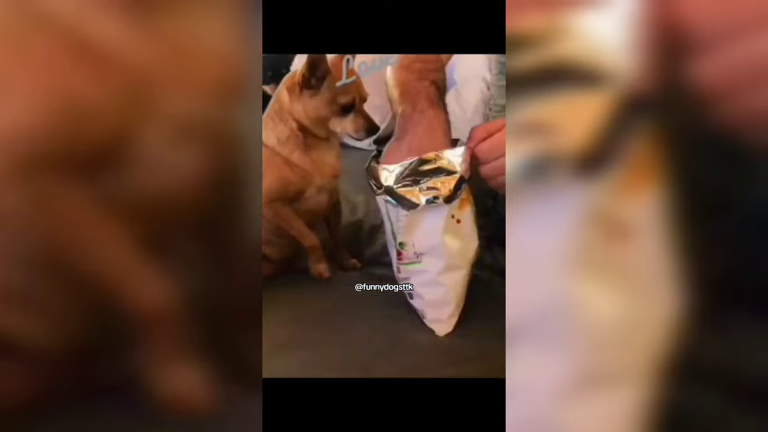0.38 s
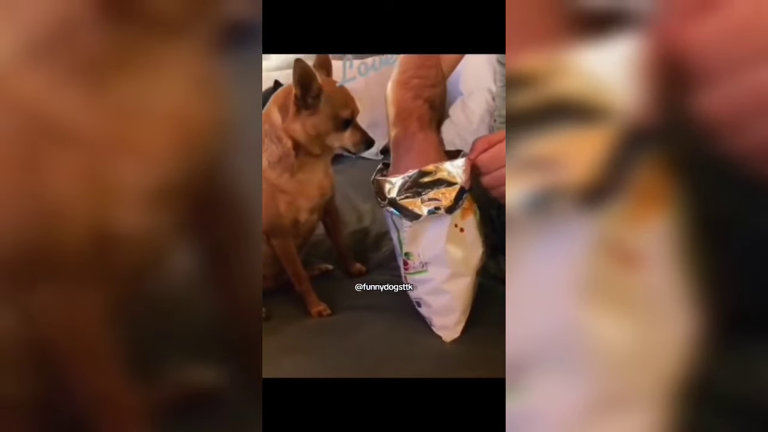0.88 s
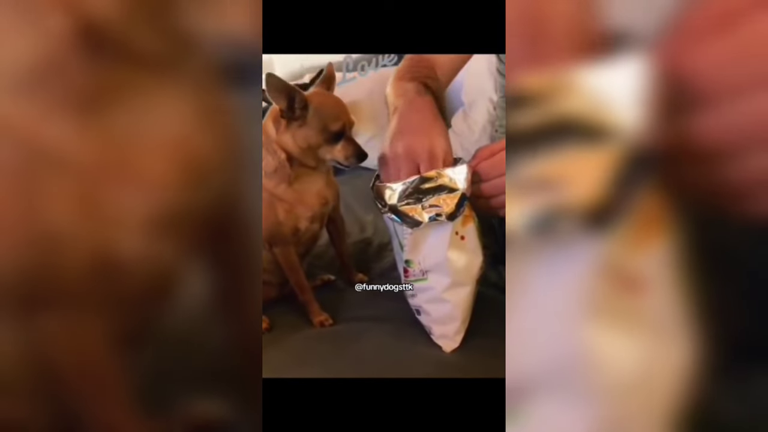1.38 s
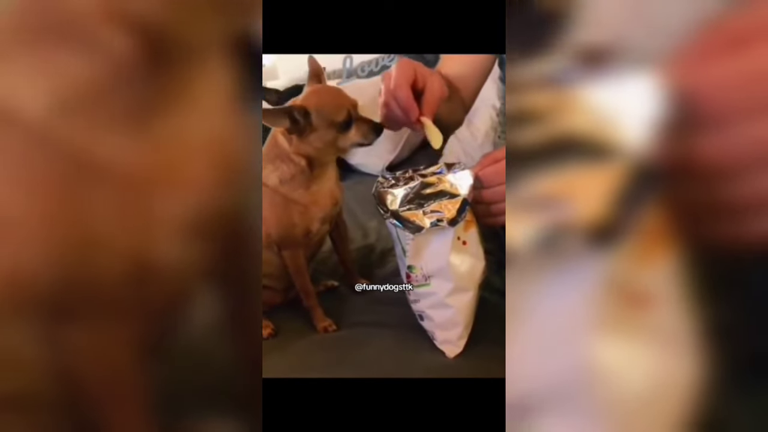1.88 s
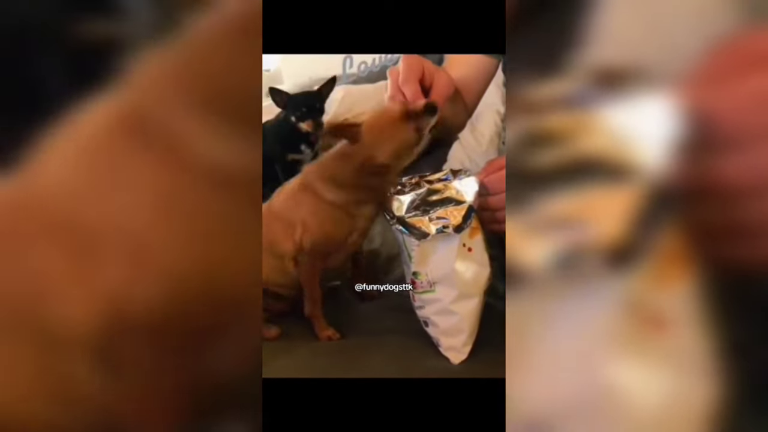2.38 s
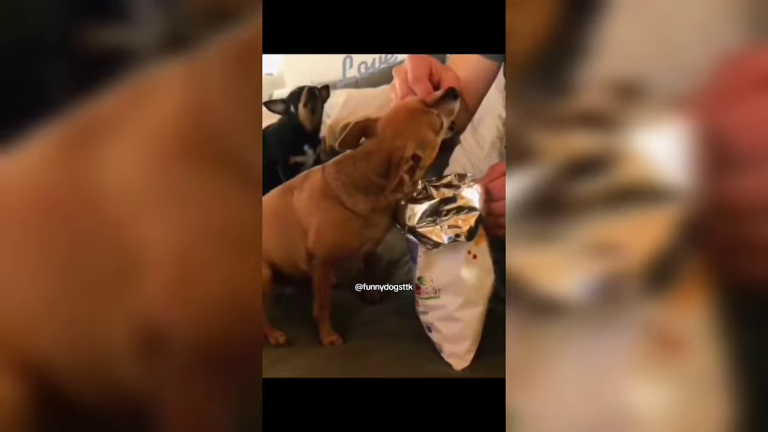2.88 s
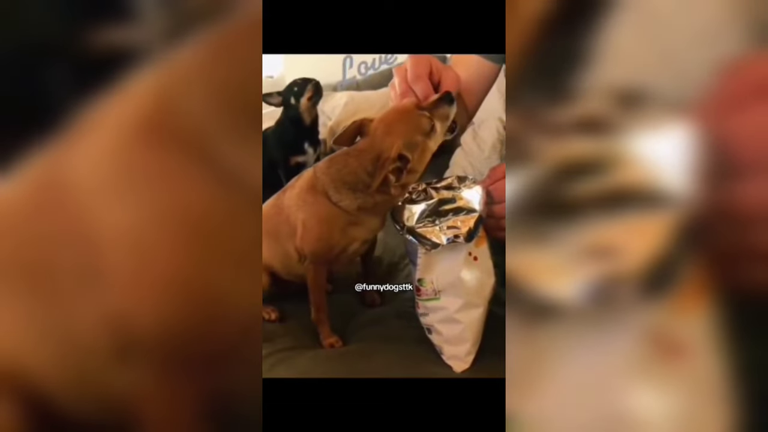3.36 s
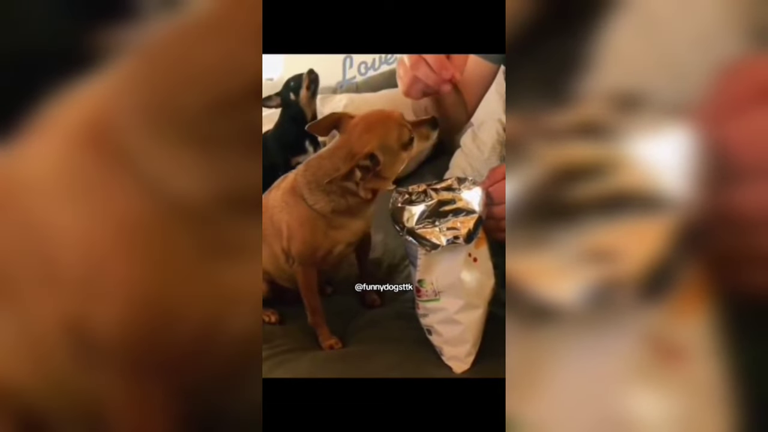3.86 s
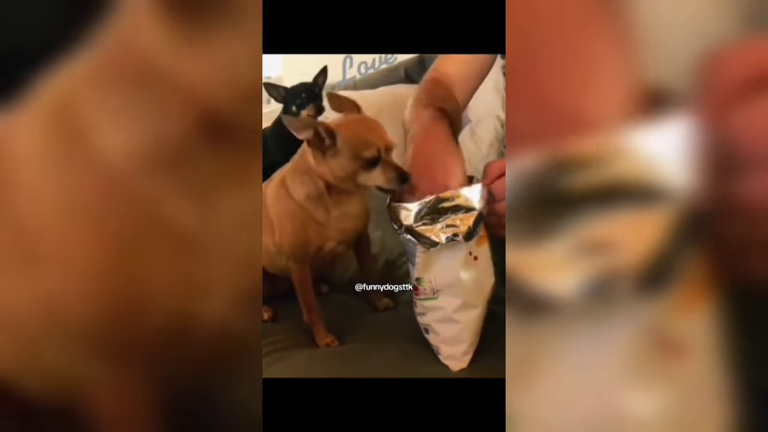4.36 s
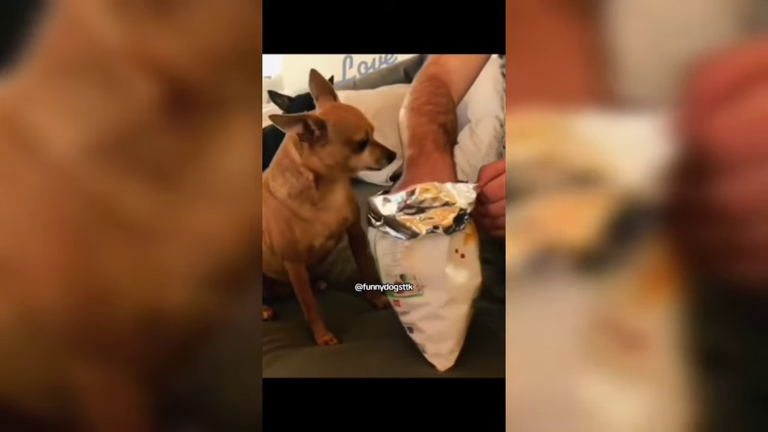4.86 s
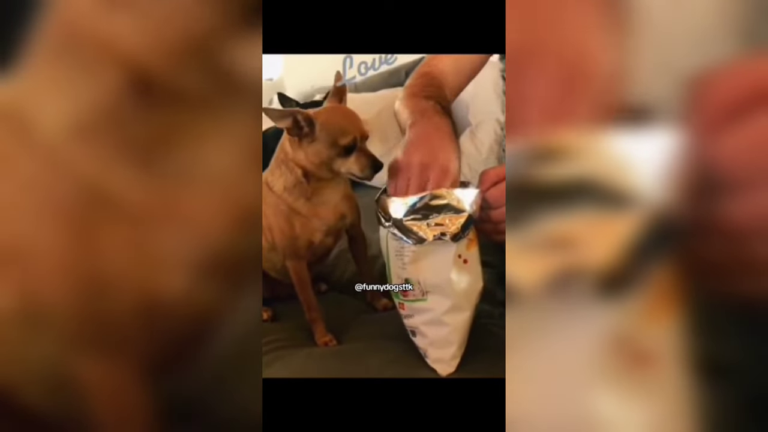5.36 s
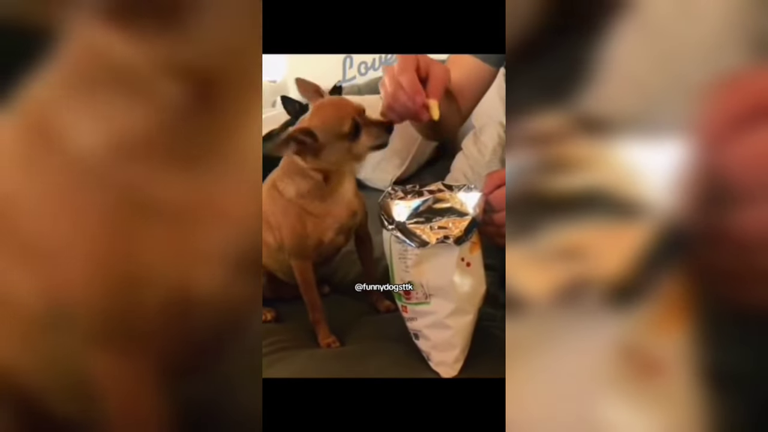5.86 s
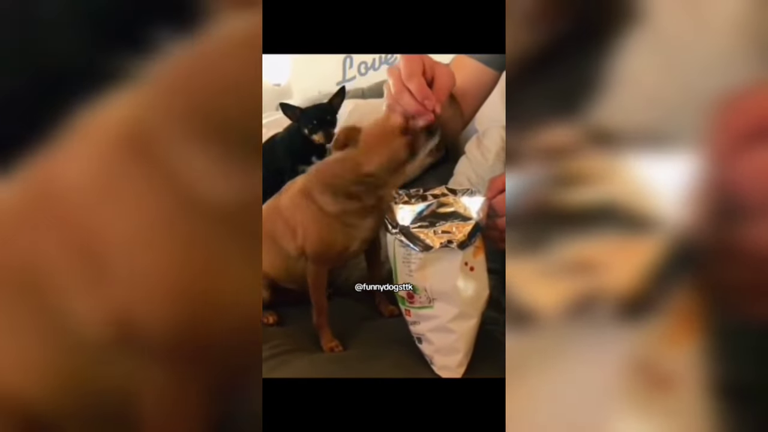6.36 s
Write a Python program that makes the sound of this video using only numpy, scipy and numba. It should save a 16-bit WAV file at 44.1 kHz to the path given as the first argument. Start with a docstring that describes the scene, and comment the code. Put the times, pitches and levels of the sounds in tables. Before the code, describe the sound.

After a scrap of room noise, a knock and brief silence, a foil snack bag crackles under a rummaging hand while a small dog barks and growls.

```python
"""First comes a scrap of steady noise from a hard-floored room; it ends in a knock and a short silence.
Then a hand rummages in a foil snack bag on a sofa: small clicks make the rustle, bursts of noise the snaps.
Soft thuds, low tones under dull noise, land on the cushions from time to time.
A small dog barks (rough pulses through a moving mouth), growls (throbbing noise), and later barks again."""
import sys
import numpy as np
from scipy import signal
from scipy.fft import rfft, irfft, next_fast_len
from scipy.io import wavfile
from scipy.ndimage import uniform_filter1d, minimum_filter1d
from numba import njit

SR = 44100
rng = np.random.default_rng(int(sys.argv[2]) if len(sys.argv) > 2 else 0)


def generate_wav(signal):
    """Clip the signal to [-1, 1] and save it as 16-bit WAV at the path in sys.argv[1]."""
    frames = np.transpose(np.atleast_2d(signal))
    scaled = np.clip(frames, -1, 1) * 32767
    pcm = np.round(scaled).astype(np.int16)
    wavfile.write(sys.argv[1], SR, pcm)


def nominal_scale(level):
    """Amplitude ratio for a level in decibels (scalar or array-like)."""
    x = np.asarray(level, float) / 20
    return 10 ** x


N = 286209
TIME = np.arange(N) / SR   # seconds

# Noise of the first room. Each row: frequency in Hz, relative level in dB per Hz.
HALL = [(24, -35), (40, 3), (579, -17), (1370, -21.5), (1580, -21.5), (2200, -30.5), (5330, -34.5),
        (9010, -41), (12000, -71), (15600, -106), (22000, -120)]
# Noise of the living room. Each row: frequency in Hz, relative level in dB per Hz.
AIR = [(25, -24), (60, -8.5), (120, 2.5), (220, -5.5), (400, -13.5), (800, -18.5), (1300, -18),
       (3000, -23.5), (7000, -31), (16000, -33)]
HALL_DB, AIR_DB = -44.5, -64   # levels of the two noises before the overall tone
SILENT_S = (.1185, .301)   # start and end of the silence

# The knock and the soft thuds. Each row: start in seconds, body peak in dB, body pitch in Hz, slap peak in dB.
THUDS = [(.11, -37.5, 176, -38), (.1145, -26.5, 620, -25), (2.054, -48, 214, -36.5),
         (3.524, -47, 188.6, -63), (3.772, -41, 201.5, -40.5), (3.793, -35, 201, -33.5),
         (3.805, -42, 127, -38.5), (4.336, -36, 188.5, -42), (4.352, -35, 187.5, -50),
         (5.784, -41.5, 234, -47.5), (5.914, -54, 215, -56), (6.075, -49.5, 240, -44.5)]
# Echoing room: longest ring time in seconds, where walls begin to dull the echo in Hz, echo gain in dB.
ROOM_T60_S, WALL_CUT_HZ, ROOM_DB = 0.36, 5830, -22

# Hand in the bag. Each row: time in seconds, foil rustle level in dB before the grip varies it.
RUMMAGE = [(.3, -68), (.4, -53), (.49, -74), (.6, -53), (.78, -50.5), (.96, -55), (1.12, -47.5),
           (1.24, -50), (1.32, -67), (1.82, -66.5), (1.99, -88), (2.08, -66), (2.3, -77), (2.9, -57.5),
           (3.45, -65.5), (3.6, -77.5), (4.08, -78), (4.12, -66), (4.29, -68), (4.33, -54), (4.425, -53),
           (4.436, -40), (4.51, -35), (4.63, -39.5), (4.76, -42.5), (4.84, -54), (5.04, -49.5), (5.39, -55),
           (5.51, -78), (6.03, -82), (6.05, -62), (6.16, -66), (6.19, -84), (6.3, -68.5)]
# Tone of the foil. Each row: frequency in Hz, relative level in dB per Hz.
FOIL = [(500, -25), (900, -1.5), (1500, 8.5), (2500, 6.5), (4000, 7), (6200, 2.5), (8000, -2),
        (12000, -5.5), (16000, -9)]
# Hollow inside of the bag. Each row: resonance in Hz, width in Hz, relative gain in dB.
HOLLOW = [(130, 60, -3.5), (240, 91, -1.5), (720, 230, -4)]
# Hollow level in dB, the rustle level in dB where it holds, and its share of the rustle's swing.
HOLLOW_DB, HOLLOW_AT_DB, HOLLOW_FOLLOWS = -51, -50, 0.78
# Clearest snapping creases. Each row: time in seconds, strength in dB, strongest pitch in Hz, low pop in dB.
SNAPS = [(.3083, -38.5, 3880, -60), (.3183, -34, 3700, -61), (.3273, -33, 3840, -57),
         (.3487, -27.5, 1560, -39.5), (.3951, -23.5, 1540, -43), (.4024, -30, 1600, -49),
         (.4505, -36.5, 1490, -59), (.5069, -25, 4120, -43), (.5433, -30, 4160, -43),
         (.5607, -26, 1450, -37.5), (.6156, -34, 4600, -55), (.6376, -23, 4280, -31.5),
         (.895, -21, 2450, -65), (.9354, -24, 3250, -29.5), (.9563, -26.5, 2340, -51),
         (1.0541, -25.5, 2780, -40), (1.1085, -21, 3060, -37), (1.1334, -27, 4220, -44),
         (1.153, -22, 4200, -53), (1.1619, -15.5, 5200, -28.5), (1.1814, -21, 1500, -38),
         (1.2094, -23, 3160, -41), (1.2287, -25.5, 3880, -55), (1.2487, -20, 3830, -33.5),
         (1.4078, -40.5, 2000, -60), (1.4268, -41, 2530, -65), (1.4677, -34.5, 3540, -46),
         (1.565, -26.5, 5840, -37), (1.5824, -29.5, 4400, -43), (1.6523, -27, 1390, -40),
         (1.761, -42, 5950, -62), (1.781, -31.5, 2780, -54), (1.9785, -37, 3760, -78),
         (2.0354, -36.5, 1880, -50), (2.0563, -23.5, 2950, -40.5), (2.0957, -34, 3220, -62),
         (2.1117, -31, 3390, -71), (2.9407, -29.5, 1525, -44), (2.954, -36, 2500, -50),
         (3.0001, -23, 1610, -35), (3.067, -34, 3000, -45), (3.2036, -20.5, 4840, -31),
         (3.4177, -35.5, 1510, -57.5), (3.7938, -45, 1535, -33), (4.352, -32, 4200, -42),
         (4.38, -23, 2670, -30), (4.4309, -8, 2520, -19.5), (4.4424, -22, 2630, -48),
         (4.5216, -14.5, 2620, -30), (4.5685, -39, 2050, -29), (4.6573, -19, 1950, -22.5),
         (4.6808, -23, 3960, -28), (4.7187, -16, 1520, -25), (4.7304, -27, 1820, -30),
         (4.7416, -20, 1520, -31), (4.7714, -17.5, 3100, -36), (4.8504, -30, 1570, -55),
         (4.8669, -28, 1960, -39), (4.9407, -25, 3970, -36), (5.0315, -27.5, 5000, -32.5),
         (5.0744, -24.5, 1500, -37), (5.0928, -24.5, 3070, -64), (5.1512, -23, 3040, -51),
         (5.2081, -29.5, 2530, -41), (5.2405, -27, 3200, -53), (5.2849, -22.5, 3000, -31),
         (5.3069, -21.5, 6070, -33), (5.3243, -19.5, 3000, -28.5), (5.3413, -21, 2630, -40),
         (5.3538, -19, 3210, -30.5), (5.3922, -26.5, 2850, -51), (5.5877, -43, 1550, -66.5),
         (5.705, -46, 3000, -62), (5.7843, -29.5, 1730, -37), (6.0362, -18.5, 6680, -35),
         (6.0791, -26.5, 5000, -44.5), (6.1474, -38.5, 2470, -52), (6.2811, -40.5, 2120, -50)]
# Lesser snaps: mean strength over the rustle in dB, most deviation in dB, pitch range in Hz,
# mean level of the low pop relative to the strength in dB.
LESSER_OVER_DB, LESSER_SPREAD_DB, LESSER_HZ, LESSER_LOW_DB = 14.5, 6, (1500, 6000), -14

# One list for each bark. Each row: time in seconds, pitch in Hz, level in dB, mouth resonance in Hz.
BARKS = [
    [(2.342, 260, -36.5, 1780), (2.349, 359.5, -17.5, 1780), (2.357, 480, -21, 1700),
     (2.36, 525.6, -5, 1590), (2.38, 545, -12, 1330), (2.395, 575.6, -15, 1280),
     (2.415, 509.5, -19.5, 1260), (2.43, 359.6, -24.5, 1260), (2.45, 230, -31, 1263),
     (2.62, 200, -48, 1450)],
    [(6.352, 319.6, -46, 1368), (6.36, 363.2, -21.5, 1470), (6.372, 433, -12.5, 1490),
     (6.386, 474, -13, 1430), (6.389, 484, -8, 1420), (6.41, 467.5, -22, 1350), (6.428, 329.6, -19.5, 1440),
     (6.455, 225.6, -35, 1450), (6.49, 200, -38, 1450)],
]
# Bright top of the bark. Each row: resonance in Hz, width in Hz, relative gain in dB.
BRIGHT = [(4236, 790, 1), (6280, 600, -2.5)]
# Cushions and bag close to the dog. Each row: echo delay in seconds, echo gain in dB.
NEAR_ECHOES = [(.0011, -6), (.0027, -6), (.0046, -6)]
# Starting ceiling of the upper resonance. One column: level in dB, one entry for each bark.
UPPER_CEILING_DB = [-30, -21]
# The mouth width belongs to the second of two passes; the upper centre is where it starts.
MOUTH_WIDTH_HZ, UPPER_HZ, UPPER_WIDTH_HZ = 220, 2650, 610
UPPER_UNDER_DB = -3.5   # below the ceiling, upper resonance relative to the bark level
UPPER_RISE_HZ_PER_S, UPPER_SWELL_DB_PER_S = 6000, 60   # climb of the upper resonance and of its ceiling
# The plain tone at the bark's pitch: level in dB at a pitch in Hz, and growth with pitch.
VOICE_DB, VOICE_AT_HZ, VOICE_DB_PER_OCTAVE = -29.5, 500, 10.5
ROUGH_LOUD, ROUGH_PER_DB = .36, 0.03   # roughness 0-1 at 0 dB; softer is rougher
VOICED_S, CLOSE_DB_PER_S = .1, 130   # time until the mouth closes, and its closing speed

# Growl. Each row: time in seconds, throbs per second, chest level in dB, mouth level in dB.
GROWL = [(2.625, 28, -78, -41), (2.66, 25.7, -48, -31), (2.7, 27, -49, -42), (2.83, 33.16, -44, -35.5),
         (2.92, 29.05, -47.5, -47), (3.2, 24.53, -38.5, -53.5), (3.32, 25.2, -42.5, -57),
         (3.4, 22.6, -46, -55), (3.48, 24, -64, -68)]
# Throat part of the growl. Each row: time in seconds, level in dB.
THROAT_SWELL = [(2.625, -54.5), (3.0, -47), (3.33, -46), (3.4, -63.5)]
# Resonances of the chest, throat and mouth in the growl, each passed twice.
# Each row: centre in Hz, width in Hz for one pass, relative gain in dB for one pass.
CHEST = [(185, 81, 0)]
THROAT = [(605, 260, 10.5), (846, 150, -22)]
MOUTH = [(1570, 214, 7), (3070, 310, 0.5)]

# Tone of the whole sound, with steps down in its top. Each row: frequency in Hz, gain in dB.
OVERALL_TONE = [(30, 0), (100, 2), (6300, 1.5), (6700, 1), (12900, 0), (13300, -7.5), (15400, -9.5),
                (16200, -51.5)]
DULL_UNTIL_S, DULL_CUT_HZ = .47, 9400   # end of the dull opening, and where its top is cut


def rms_one(x):
    """Scale to an rms (average strength) of 1."""
    return x / np.sqrt(np.mean(x ** 2) + 1e-30)


def evened(x, span_s):
    """Divide by the running rms, so that an envelope alone sets the level."""
    return x / np.sqrt(uniform_filter1d(x ** 2, int(span_s * SR)) + 1e-9)


def in_time(rows):
    """Columns of a curve at every sample, then 1 while the curve lasts."""
    s, *columns = np.transpose(rows)
    curves = [np.interp(TIME, s, c) for c in columns]
    return curves + [(TIME >= s[0]) & (TIME <= s[-1])]


def drift(rate):
    """Random wandering with a spread of about 1; a higher rate wanders faster."""
    knots = np.arange(0, N + SR, SR / rate / 2)
    return np.interp(np.arange(N), knots, rng.standard_normal(len(knots))) * np.sqrt(3 / 2)


def coloured(x, points):
    """Filter x by a curve of (Hz, dB), with no sound ahead of its cause (minimum phase)."""
    size = next_fast_len(N + SR // 4) // 2 * 2
    hz = np.maximum(np.arange(size // 2 + 1) * SR / size, 1)
    point_hz, point_db = np.transpose(points)
    gain = nominal_scale(np.interp(np.log(hz), np.log(point_hz), point_db))
    cepstrum = irfft(np.log(gain), size)
    cepstrum[1:size // 2] *= 2
    cepstrum[size // 2 + 1:] = 0
    return irfft(rfft(x, size) * np.exp(rfft(cepstrum)), size)[:N]


@njit
def glide(x, hz, width, sr):
    """A resonance of gain 1 whose centre may move."""
    y, r = np.zeros(len(x)), np.exp(-np.pi * width / sr)
    for i in range(2, len(x)):
        fed = (1 - r * r) / 2 * (x[i] - x[i - 2])
        y[i] = fed + 2 * r * np.cos(2 * np.pi * hz[i] / sr) * y[i - 1] - r * r * y[i - 2]
    return y


def resonances(x, table):
    """Fixed resonances side by side, signs alternating."""
    return sum((-1) ** k * nominal_scale(db) * glide(x + 1e-18, np.full(len(x), float(hz)), float(width), SR)
               for k, (hz, width, db) in enumerate(table))


def band(x, low_hz, high_hz):
    """Keep mainly the sound between two frequencies."""
    edges = [low_hz, min(high_hz, SR / 2.2)]
    return signal.sosfilt(signal.butter(2, edges, "band", fs=SR, output="sos"), x)


def air(points, level_db):
    """Steady room noise: random noise shaped by a tone curve."""
    return nominal_scale(level_db) * rms_one(coloured(rng.standard_normal(N), points))


def thuds(body_s=0.012, slap_s=0.0079):
    """A push or knock sets a body ringing under a dull slap of noise."""
    t, out = np.arange(5000) / SR, np.zeros(N + 5000)
    noise = rng.standard_normal((len(THUDS), 5000))
    for (s, peak_db, hz, slap_db), n in zip(THUDS, noise):
        i = int(s * SR)
        body = np.sin(2 * np.pi * hz * t) * (1 - np.exp(-t / 0.0036)) * np.exp(-t / body_s)
        slap = band(band(n * np.exp(-t / slap_s), 500, 1350), 400, 1500)
        out[i:i + 5000] += nominal_scale(peak_db) * body / abs(body).max() + nominal_scale(slap_db) * slap / abs(slap).max()
    return out[:N]


def room(x):
    """Echoes: sixteen feedback delays, duller on every round, smeared by two allpasses."""
    size = next_fast_len(N + SR)
    w = 2 * np.pi * np.arange(size // 2 + 1) / size
    wall_loss = (1 + (w * SR / 2 / np.pi / WALL_CUT_HZ) ** 2) ** .5
    low_loss = (1 + (350 * 2 * np.pi / SR / (w + 1e-6)) ** 2) ** 0.23   # lows ring shorter too
    t60 = ROOM_T60_S / wall_loss / low_loss
    response = 0
    for k, lag in enumerate(rng.uniform(.012, .045, size=16) * SR):
        loop = nominal_scale(-60 * lag / SR / t60) * np.exp(-1j * w * lag)
        response = response + (-1) ** k * loop / (1 - loop)
    for lag in (67, 191):   # samples
        delay = np.exp(-1j * w * lag)
        response = response * (delay - .6) / (1 - .6 * delay)
    return irfft(rfft(x, size) * response, size)[:N]


def rustle(per_s=3000, spread_db=2.5, clump_db=6, cycles=7.0, hiss_db=-6, grip_db=2.6):
    """Small creases buckle in clumps, each ringing at a pitch dealt to it; the bag's hollow answers below."""
    foil_db, on = in_time(RUMMAGE)
    hollow_db = HOLLOW_DB + HOLLOW_FOLLOWS * (foil_db - HOLLOW_AT_DB)
    sizes = nominal_scale(spread_db * np.minimum(rng.exponential(1, N), 5)) * rng.choice([-1, 1], N)
    clicks = sizes * (rng.random(N) < per_s * nominal_scale(clump_db * drift(30)) / SR)
    pitches, dealt = np.geomspace(800, 16000, num=14), rng.integers(0, 14, N)   # each click gets a pitch
    grains = sum(rms_one(resonances(clicks * (dealt == k), [(hz, hz / cycles, 0)])) * np.sqrt(hz)
                 for k, hz in enumerate(pitches))
    foil = coloured(rms_one(grains) + nominal_scale(hiss_db) * rng.standard_normal(N), FOIL)
    hollow = resonances(rms_one(clicks) + rng.standard_normal(N), HOLLOW)
    # harder crushing is brighter
    foil = foil + np.clip((foil_db + 49.5) / 14, 0, 1.5) * band(foil, 7000, 16000)
    grip = nominal_scale(grip_db * drift(12))   # the fingers press unevenly
    return on * grip * (nominal_scale(foil_db) * rms_one(foil) + nominal_scale(hollow_db) * rms_one(hollow))


def lesser_snaps(count=60):
    """Rows like SNAPS at random moments, with strengths that follow the rustle."""
    when, size, tone, low = rng.random((count, 4)).T
    s = RUMMAGE[0][0] + when * (RUMMAGE[-1][0] - RUMMAGE[0][0])
    peak_db = np.interp(s, *np.transpose(RUMMAGE)) + LESSER_OVER_DB + LESSER_SPREAD_DB * (2 * size - 1)
    hz = LESSER_HZ[0] * (LESSER_HZ[1] / LESSER_HZ[0]) ** tone
    return list(zip(s, peak_db, hz, peak_db + 2 * low * LESSER_LOW_DB))


def snaps(crack_s=.0008, ring_s=0.0047, low_s=0.0034, crack_db=-3, sharpness=3.47, after_db=-5, after_s=0.009):
    """A crease flips: a wide crack, neighbours giving way after it, a ring and a duller pop of the bag."""
    t, out, cracks = np.arange(1500) / SR, np.zeros(N + 1500), np.zeros(N + 1500)
    rows = SNAPS + lesser_snaps()
    noise, luck = rng.standard_normal((len(rows), 1500)), rng.random((len(rows), 1500))
    swell = 1 - np.exp(-t / 0.0015)
    for (s, peak_db, hz, low_db), n, u in zip(rows, noise, luck):
        i = int((s - .001) * SR)
        main_flip = np.arange(1500) == 44   # 1 ms in
        neighbours = (u < 700 / SR) * u * SR / 700 * np.exp(-t / after_s)
        flips = main_flip + nominal_scale(after_db) * neighbours
        crack = signal.lfilter([1], [1, -np.exp(-1 / (crack_s * SR))], flips)
        tick = n * (crack + 0.095 * swell * np.exp(-t / 0.013))
        struck = tick + 0.48 * n * swell * np.exp(-t / ring_s)
        ring = glide(struck, np.full(1500, float(hz)), hz / sharpness, SR)
        pop = band(n * swell * np.exp(-t / low_s), 350, 1502)
        cracks[i:i + 1500] += nominal_scale(peak_db + crack_db) * tick / abs(tick).max()
        out[i:i + 1500] += nominal_scale(peak_db - 9.5) * ring / abs(ring).max() + nominal_scale(low_db) * pop / abs(pop).max()
    return out[:N] + coloured(cracks[:N], FOIL)


def near_echoes(x):
    """Surfaces within arm's reach smear each pulse with short echoes."""
    return x + sum((-1) ** k * nominal_scale(db) * np.interp(TIME - s, TIME, x)
                   for k, (s, db) in enumerate(NEAR_ECHOES))


def bark(rows, ceiling_db, jitter=.04, uneven=0.69, spread_db=-12, air_db=-18):
    """Uneven vocal-fold pulses, with a puff of noise each cycle, through a moving mouth resonance."""
    pitch, level_db, mouth_hz, on = in_time(rows)
    since = np.clip(TIME - rows[0][0], 0, .08)   # the jaw has opened fully after this long
    closing_db = CLOSE_DB_PER_S * np.maximum(TIME - rows[0][0] - VOICED_S, 0)
    upper_db = np.minimum(ceiling_db + UPPER_SWELL_DB_PER_S * since - level_db, UPPER_UNDER_DB) - closing_db
    voice_db = VOICE_DB + VOICE_DB_PER_OCTAVE * np.log2(pitch / VOICE_AT_HZ)
    voice_db = np.minimum(voice_db, level_db - 8) - 2 * closing_db
    rough = np.clip(ROUGH_LOUD - ROUGH_PER_DB * level_db, .15, 1)
    phase = np.cumsum(pitch * (1 + jitter * rough * drift(250)) / SR)
    # every other cycle differs, which adds tones at half the pitch
    strong_weak = 1 + uneven * rough * (-1) ** np.floor(phase)
    pulses = rms_one(band(np.diff(np.floor(phase), prepend=0) * strong_weak, 200, 9800))
    puffs = rng.standard_normal(N) * 2 * np.exp(-2.5 * (phase % 1))
    source = near_echoes(np.sqrt(1 - rough ** 2) * pulses + rough * puffs)
    shimmer = nominal_scale(3 * rough * drift(170))   # quick wavering of the level
    mouth = glide(source, mouth_hz, 1.73 * MOUTH_WIDTH_HZ, SR)
    mouth = glide(mouth, mouth_hz, float(MOUTH_WIDTH_HZ), SR)
    upper_hz = UPPER_HZ + UPPER_RISE_HZ_PER_S * since
    upper = glide(band(source, 1800, 4900), upper_hz, float(UPPER_WIDTH_HZ), SR)
    between = rms_one(band(source, 600, 2300))   # tones beside the mouth resonance
    bright = rms_one(resonances(band(source, 3400, 6400), BRIGHT))
    top = bright + nominal_scale(-7) * rms_one(band(source, 9400, 13000))
    sound = evened(mouth, span_s=0.0091) - nominal_scale(upper_db) * evened(upper, span_s=.012)
    sound += nominal_scale(spread_db) * between
    sound += nominal_scale(air_db + upper_db / 2) * top   # the top opens with the upper resonance
    voice = np.sin(2 * np.pi * np.cumsum(pitch / SR))   # the plain tone stays clean
    return on * (nominal_scale(level_db) * shimmer * sound + nominal_scale(voice_db) * voice)


def growl(sharp=0.33, throb_db=1.5, flutter_db=1.0, breath_db=-22):
    """Slack folds flap in throbs of noise that sound through chest, throat and, with a flutter, mouth."""
    per_s, chest_db, mouth_db, on = in_time(GROWL)
    throat_db, _ = in_time(THROAT_SWELL)
    phase = np.cumsum(on * per_s / SR)
    throb = np.exp(sharp * (np.cos(2 * np.pi * phase) - 1)) * nominal_scale(throb_db * drift(25))
    source = throb ** 2 * nominal_scale(flutter_db * drift(90)) * rng.standard_normal(N)
    noise = rng.standard_normal(N)
    chest, throat = (rms_one(throb * evened(resonances(resonances(noise, body), body), span_s=0.092))
                     for body in (CHEST, THROAT))
    mouth = rms_one(resonances(resonances(source, MOUTH), MOUTH))
    mouth = mouth + nominal_scale(breath_db) * rms_one(band(source, 980, 6900))
    return on * (nominal_scale(chest_db) * chest + nominal_scale(throat_db) * throat + nominal_scale(mouth_db) * mouth)


def scene():
    """Dog and bag in the living room, after the scrap of the first room."""
    dog = sum(bark(rows, db) for rows, db in zip(BARKS, UPPER_CEILING_DB)) + growl()
    bag = rustle() + snaps() + thuds()
    wet = nominal_scale(ROOM_DB) * room(dog + nominal_scale(2) * bag)
    floor = np.where(TIME < SILENT_S[0], air(HALL, HALL_DB), air(AIR, AIR_DB))
    return (dog + bag + wet + floor)[None]


def limited(x, hold_s=0.0018):
    """Gain dips smoothly just around any peak that would pass full scale."""
    span = int(hold_s * SR)
    gain = minimum_filter1d(1 / np.maximum(abs(x), 1), 2 * span + 1)
    return x * uniform_filter1d(uniform_filter1d(gain, span), span)


def band_limit(x):
    """A steep low-pass at the top of the band."""
    return signal.sosfilt(signal.butter(12, 16380, fs=SR, output="sos"), x)


def record(dry):
    """Overall tone, then a limiter; one stretch is mute and the top is missing just after it."""
    level = limited(coloured(dry[0], OVERALL_TONE))[None]
    dull = signal.sosfilt(signal.cheby2(10, 60, DULL_CUT_HZ, fs=SR, output="sos"), level)
    toned = np.where((TIME > SILENT_S[0]) & (TIME < DULL_UNTIL_S), dull, level)
    sounding = 1. * ((TIME < SILENT_S[0]) | (TIME > SILENT_S[1]))
    heard = uniform_filter1d(sounding, size=120)   # soft edges on the mute
    return band_limit(toned * heard)


dry = scene()
out = record(dry)
generate_wav(out)
```